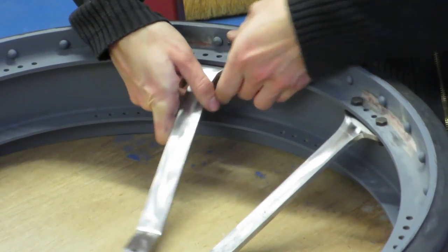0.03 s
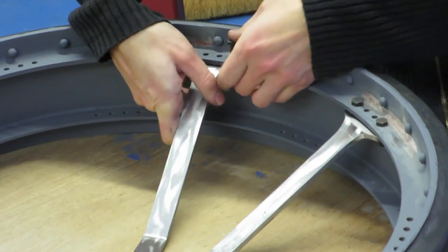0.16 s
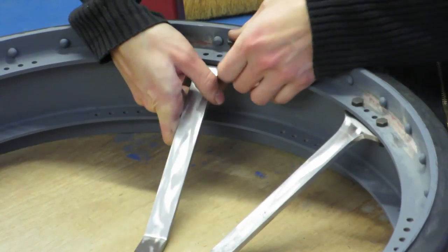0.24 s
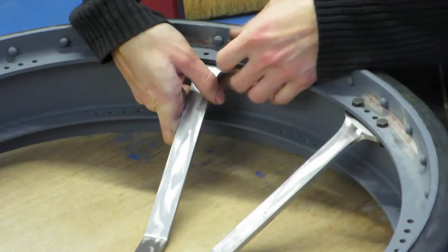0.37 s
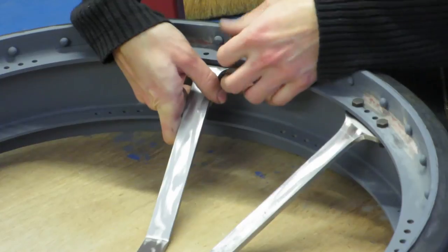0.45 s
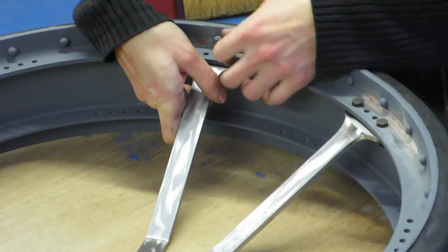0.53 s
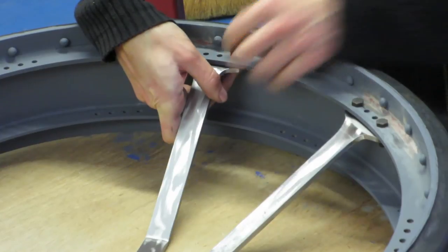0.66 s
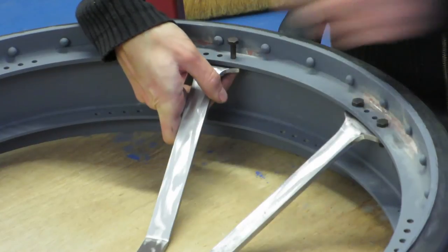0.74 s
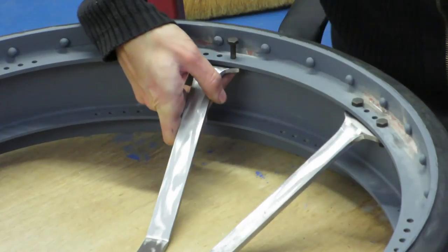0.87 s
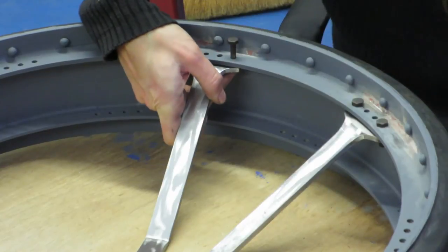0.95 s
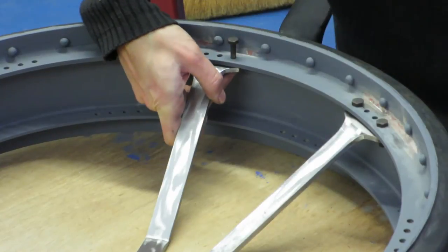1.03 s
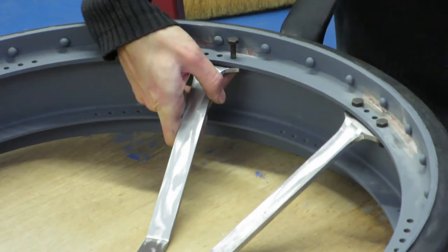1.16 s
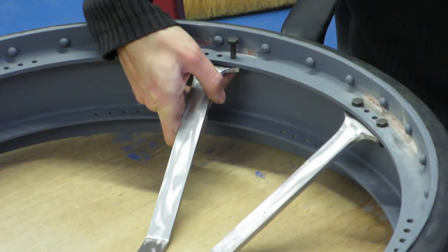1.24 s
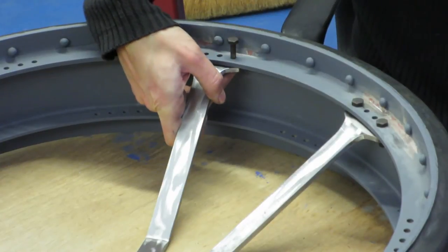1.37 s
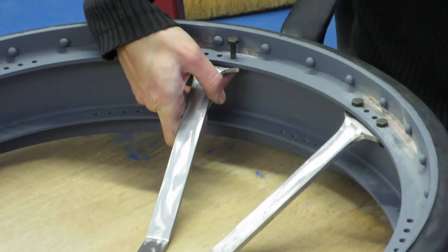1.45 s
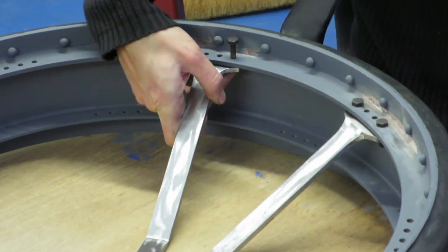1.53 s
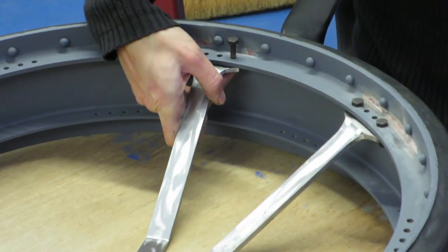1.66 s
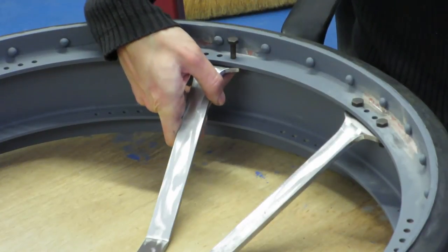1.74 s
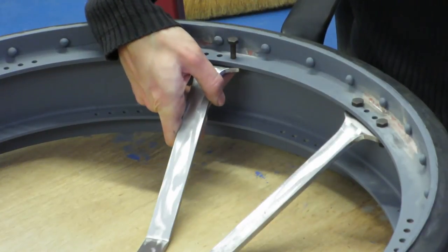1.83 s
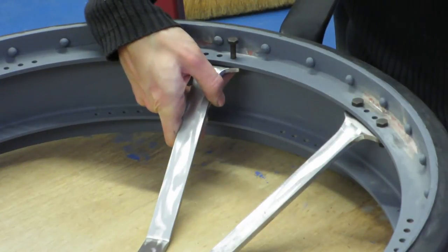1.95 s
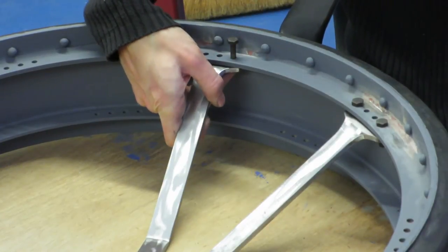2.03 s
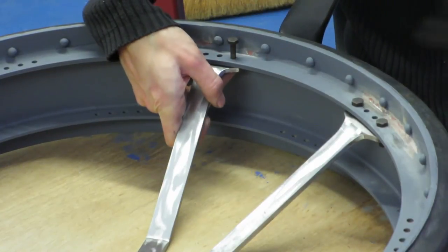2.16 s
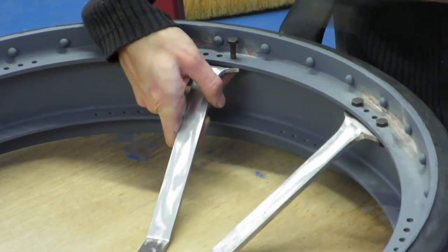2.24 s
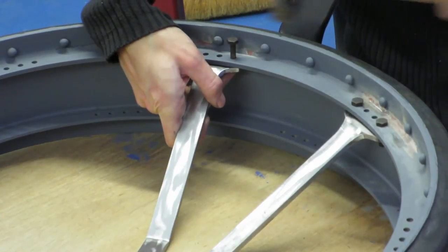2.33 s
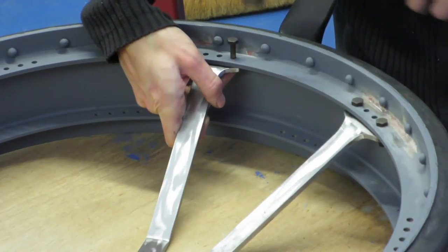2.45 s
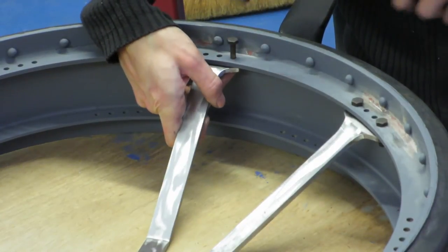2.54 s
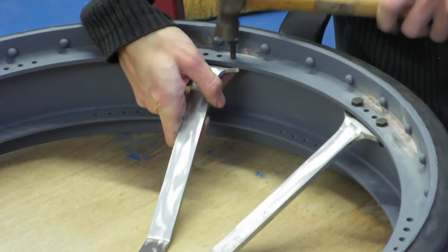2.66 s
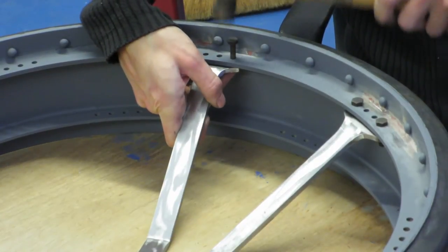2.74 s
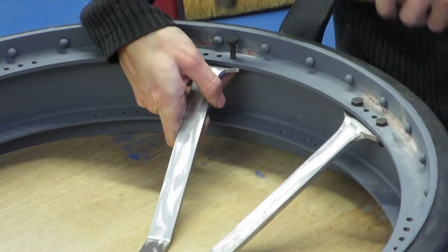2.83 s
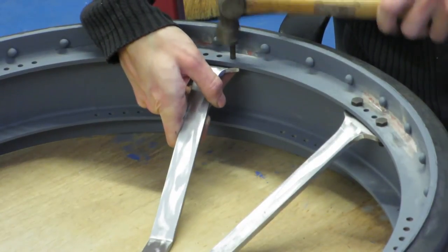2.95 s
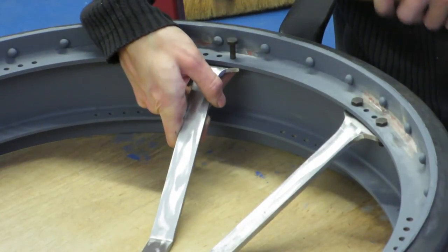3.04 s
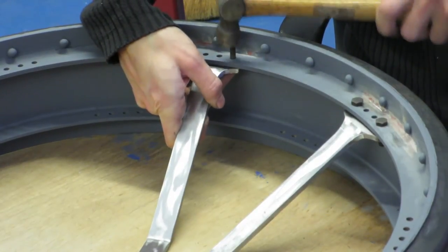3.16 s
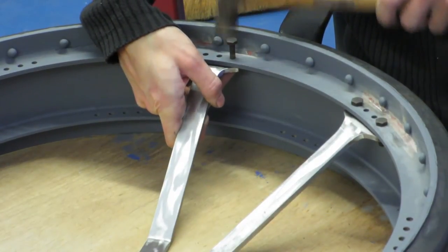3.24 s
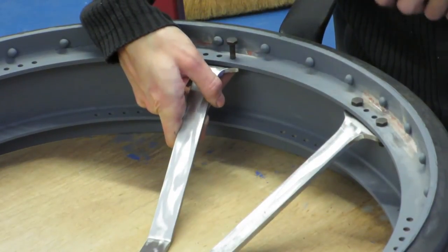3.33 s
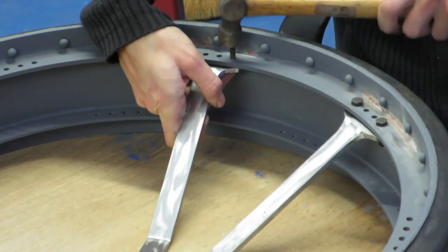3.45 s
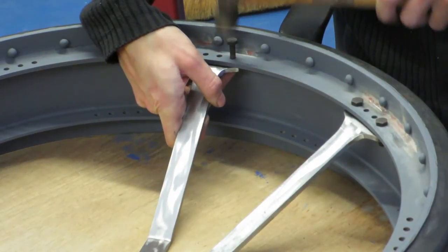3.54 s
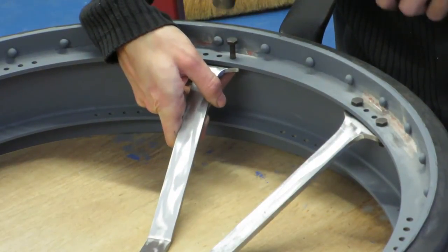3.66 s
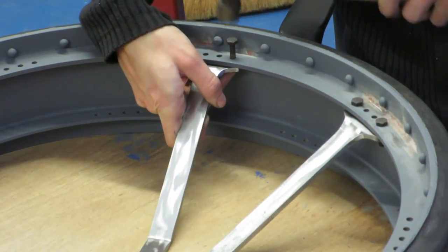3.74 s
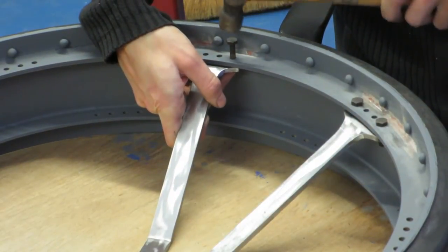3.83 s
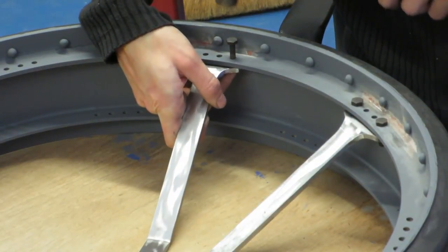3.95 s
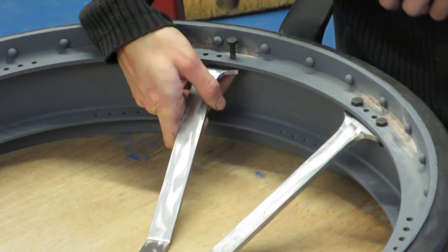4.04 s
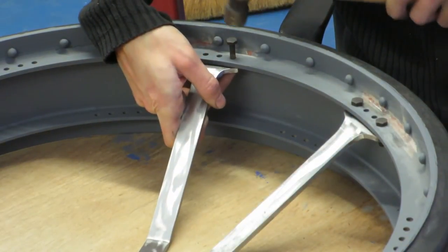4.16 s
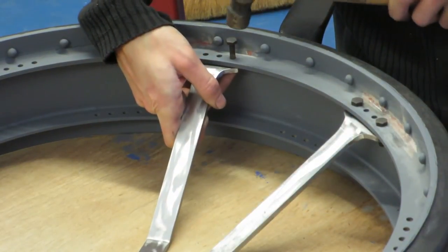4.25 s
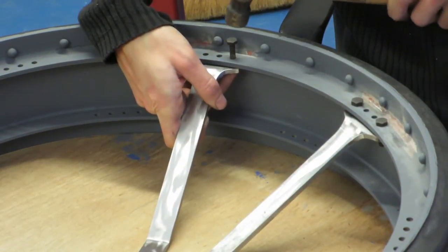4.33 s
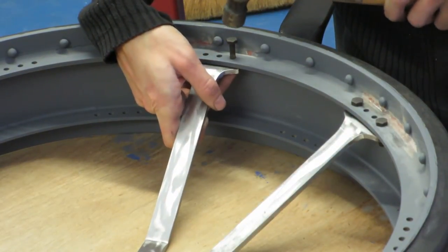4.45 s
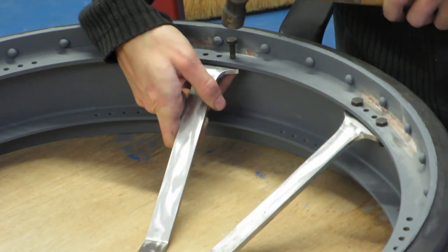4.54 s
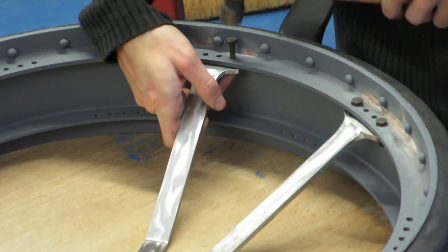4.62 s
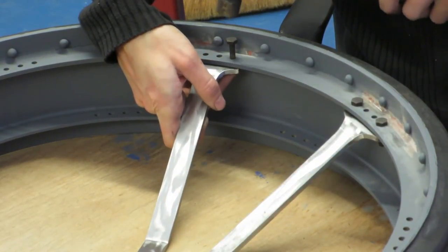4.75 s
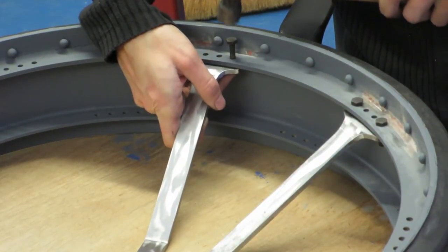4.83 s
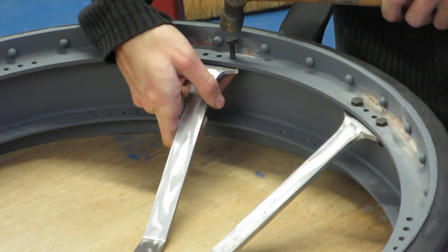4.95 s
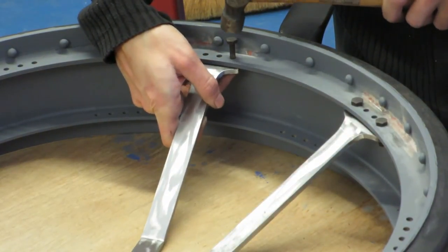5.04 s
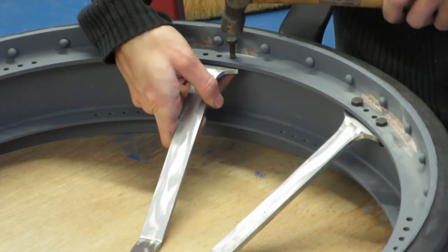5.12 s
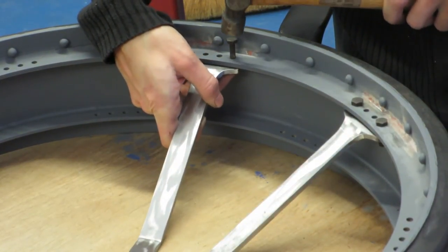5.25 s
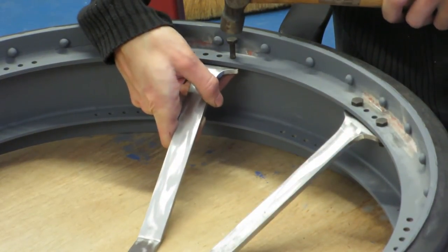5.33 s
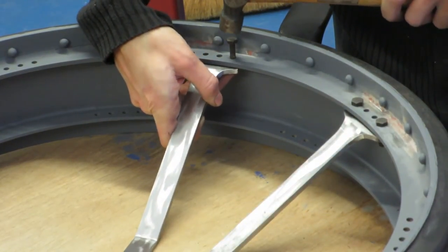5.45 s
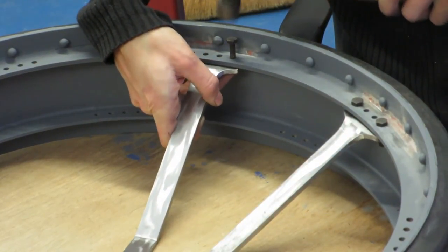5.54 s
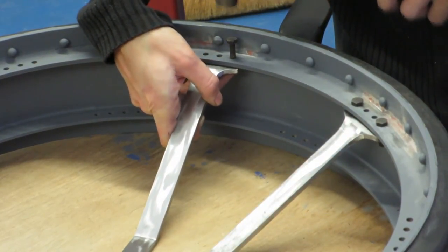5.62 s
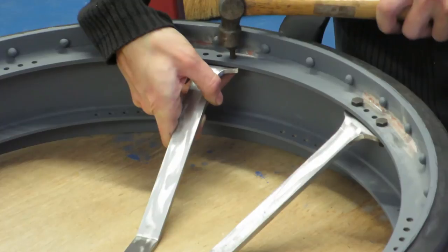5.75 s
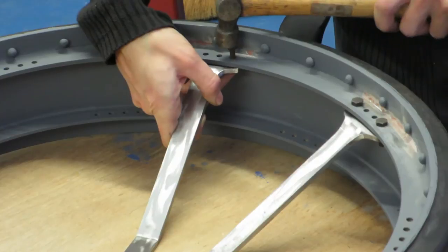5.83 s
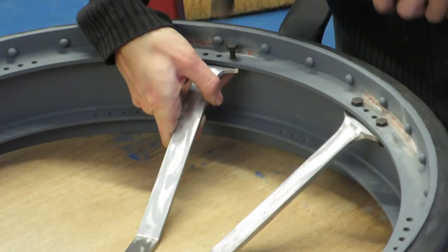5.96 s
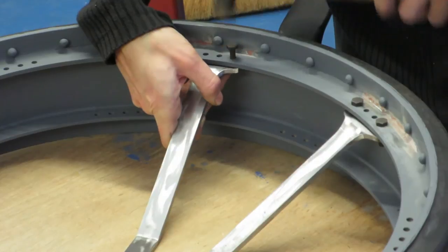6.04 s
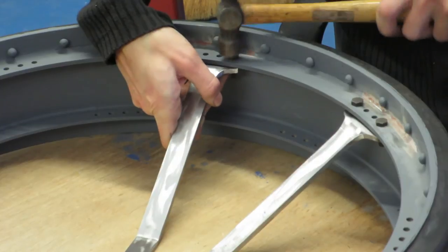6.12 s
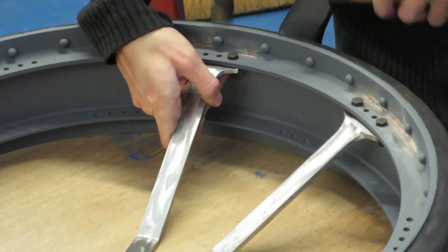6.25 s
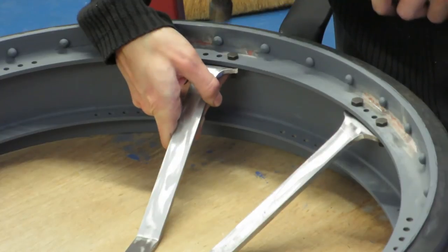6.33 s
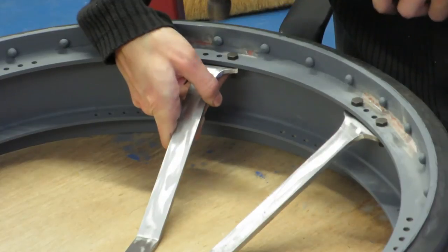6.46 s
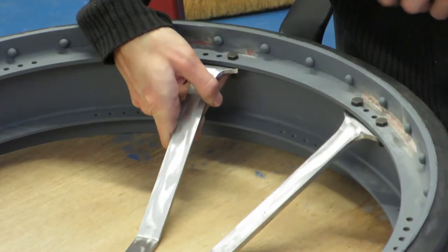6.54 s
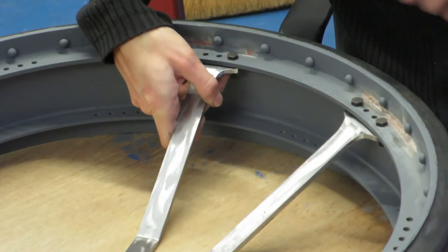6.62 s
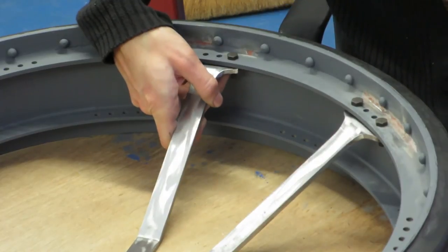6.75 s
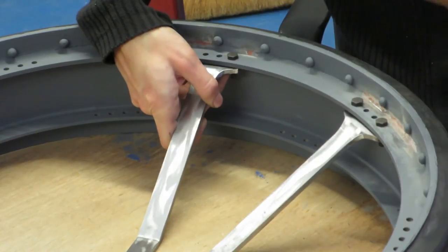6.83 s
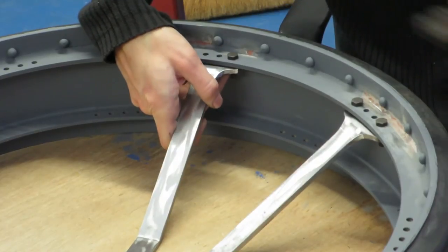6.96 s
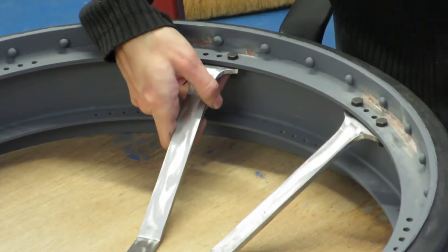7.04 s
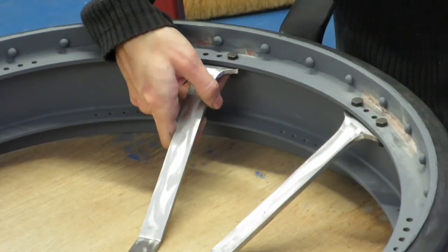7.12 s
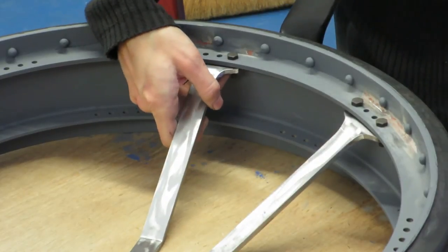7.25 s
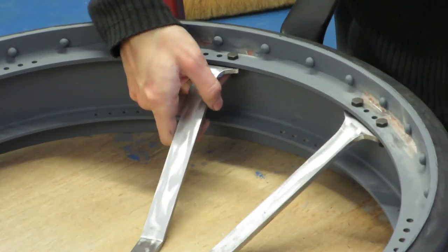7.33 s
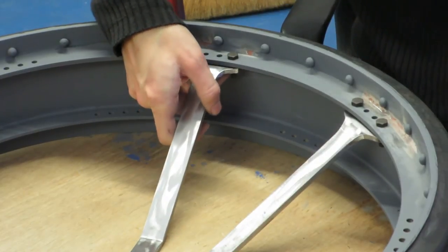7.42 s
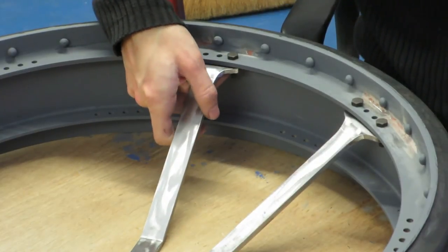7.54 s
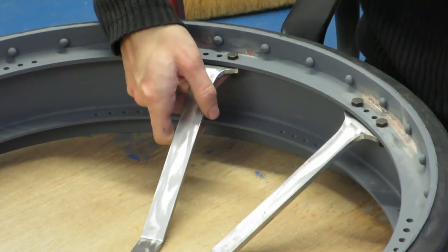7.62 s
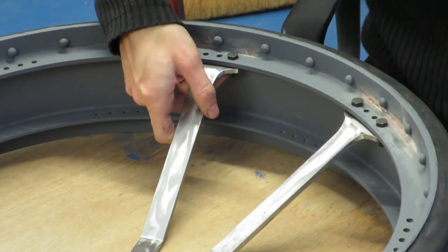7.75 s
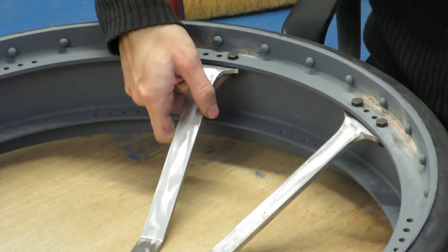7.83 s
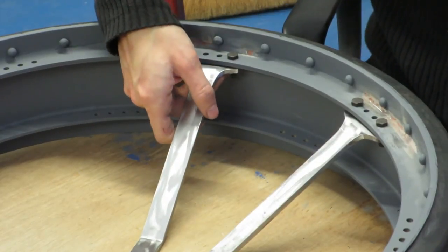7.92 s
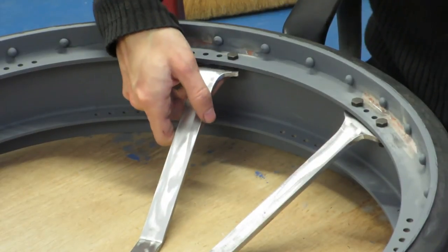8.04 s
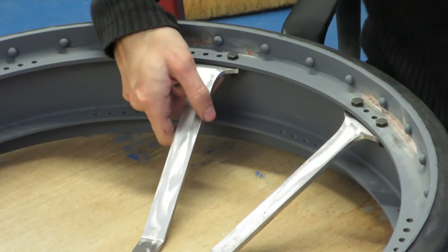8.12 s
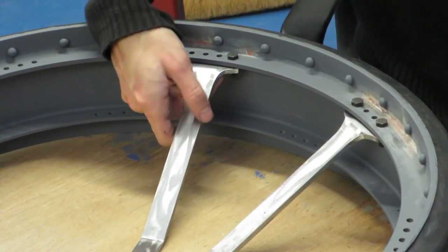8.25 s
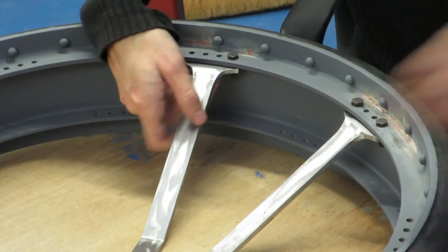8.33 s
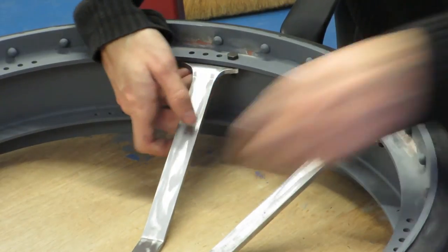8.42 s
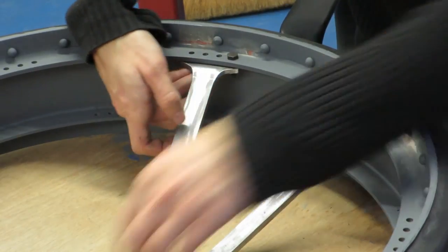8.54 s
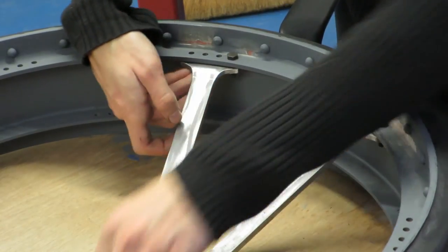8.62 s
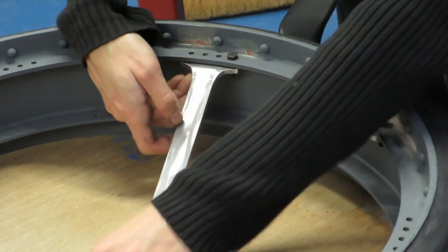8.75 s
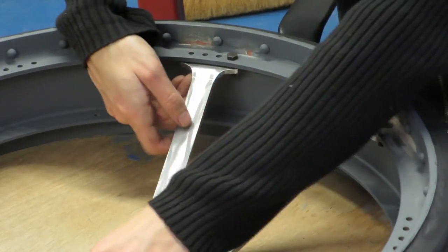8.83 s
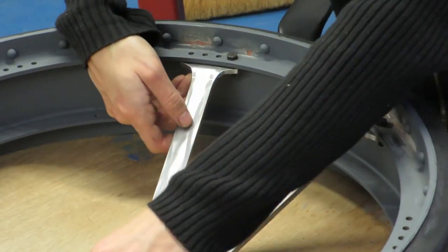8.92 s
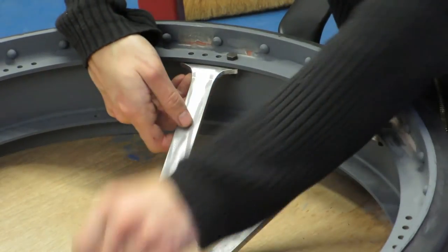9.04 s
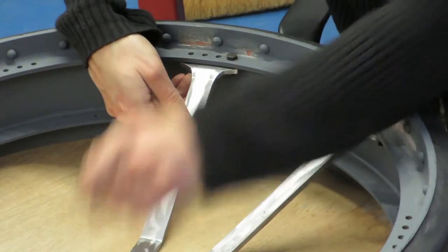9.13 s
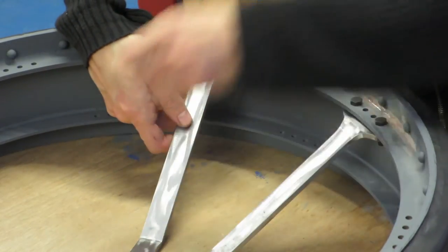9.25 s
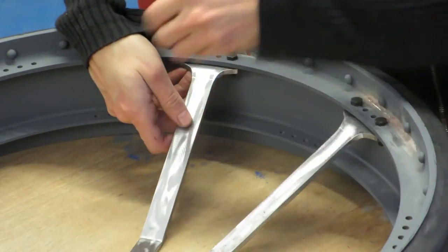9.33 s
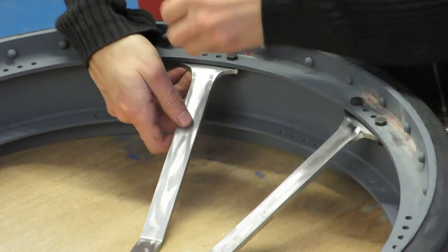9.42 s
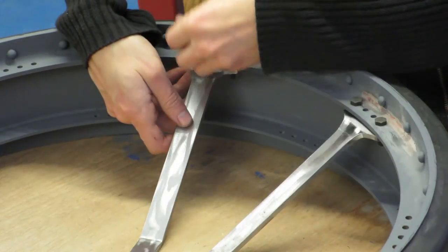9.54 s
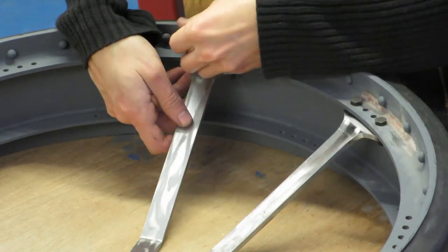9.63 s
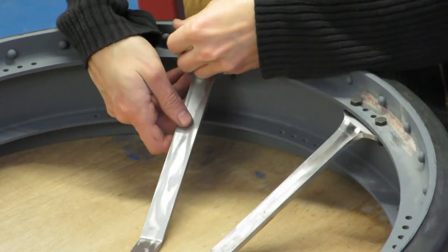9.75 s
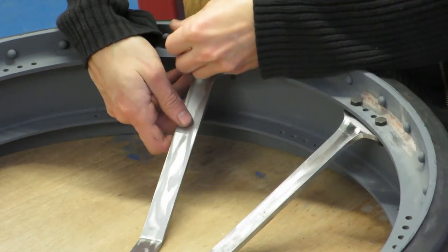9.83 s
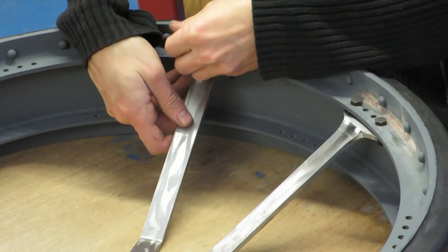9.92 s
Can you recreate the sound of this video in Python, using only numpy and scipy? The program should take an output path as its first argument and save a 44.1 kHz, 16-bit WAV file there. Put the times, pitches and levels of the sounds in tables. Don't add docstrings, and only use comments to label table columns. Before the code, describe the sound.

Close stereo microphone, hard-walled workshop, steady dull hum. A spoke clunks on metal, small rivets tinkle brightly, then three quick hammer strikes crack loudly, overloading slightly and echoing. The wheel rocks softly; a skidding blow and a duller seated blow come less than half a second apart. Later there is a heavy bench thump, a bouncing steel tool with bright ring, light bumps, a tick and quiet handling.

```python
import sys
import numpy as np
from scipy import signal
from scipy.fft import irfft
from scipy.io import wavfile
from scipy.ndimage import uniform_filter1d

SR = 44100
rng = np.random.default_rng(int(sys.argv[2]) if len(sys.argv) > 2 else 0)


def wav_out(sig):
    wavfile.write(sys.argv[1], SR, np.round(np.clip(np.atleast_2d(sig).T, -1, 1) * 32767).astype(np.int16))


def ratio(d):
    e = np.asarray(d, float) / 20
    return 10 ** e


N = 440118

# [start t/s, knock level/dB, then thud, click and ring level/dB over the knock]
HAMMER_BLOWS = [
    (2.921, 1.5, -9.5, -8, -16),
    (3.188, -1, -10.5, -8, -13.5),
    (3.205, -27.5, 17.5, -15.5, -22),
    (3.455, -1.5, -11, -9, -15.5),
    (3.477, -18.5, 11.5, -21, -26),
]
GLANCING_BLOW = [
    (5.7195, -10, -21, 5, -1.5),
    (5.731, -21, -10.5, 2.5, -12.5),
    (5.752, -30, 5.5, -20.5, -25),
    (6.118, -25, -21.5, 3.5, -17),
]
RIVET_SEATS = [
    (5.735, -54, -13.5, -12.5, 5),
    (6.135, -48.5, -8, -16, 7.9),
]
LAST_BLOW = [
    (6.129, -5, -2.5, 0, -13.5),
    (6.138, -9.5, -5.5, -15.5, -17),
]
SPOKE_FITTED = [
    (.043, -48.5, 5.5, -9.5, 1.5),
    (.463, -14.5, 4, -23.5, -17.5),
    (.468, -28, -12, -12, 0.5),
    (4.140, -30.5, -9, -8.5, -5.5),
    (4.158, -33, 10, -37.5, -32.5),
    (4.468, -56.5, 13.5, -31.5, -9),
]
WHEEL_NUDGES = [
    (5.149, -35, 6, -19.5, 11.7),
    (5.157, -34, 4.4, -25, 8.6),
    (5.180, -39, 6, -26.5, 4),
    (5.201, -41.5, 8.6, -31, 3.1),
    (5.238, -46.5, 6, -27, 4),
    (5.270, -51, 6, -26.5, 6),
]
RIVET_TOUCHES = [
    (1.274, -45.5, 5, 1.2, -41),
    (1.388, -43.5, -20, 6, -1),
    (1.431, -46, -20.5, 5, -1),
]
RIVET_LANDINGS = [
    (1.340, -46, -12, -22, -3),
    (1.353, -40, -6, -28, -3),
    (1.3815, -20.5, -11, -25, -7),
    (1.418, -15.5, -20, -22, 2.5),
    (1.460, -21, -21, -26, 0),
    (1.4975, -9, -26.5, -12.5, 7.5),
]
TOOL_LANDS = [
    (8.036, -12, -5.5, -8, -10.5),
    (8.045, -19, 4.5, -7.5, -29),
    (8.109, -8, -35, -1, -19),
]
TOOL_BOUNCES = [
    (8.126, -14, -7.5, -7.5, 1.55),
    (8.193, -32, -22, -23.5, 2),
    (8.240, -23, -10, -12.5, 1),
]
NUT_SNAPS = [
    (6.603, -71, -13, -31, 6),
    (9.2492, -32.5, -16, -3.5, 7.4),
]
HANDLE_CLINKS = [
    (7.044, -61, 18, -32, -11.5),
    (7.141, -56, 12.5, -21, -0.5),
    (7.375, -62, -11, -33, -13.5),
]
BENCH_KNOCKS = [
    (.944, -47.5, -5, -5.5, -15),
    (7.437, -61.5, 8.5, -32, -9),
    (7.551, -62.5, 8, -20.5, -4),
    (8.729, -49, 14, -4, 9.5),
    (8.761, -28.5, -20, -33, -63),
    (8.928, -42, -4.5, -26, -30),
]
BENCH_SLAM = [
    (7.851, -17.5, 8.6, -13.5, -4.5),
    (7.878, -34, 18, -9, -12),
]
FINGER_TOUCHES = [
    (8.755, -53, -18.5, 4.5, -17.5),
    (8.897, -65, -12, 6, -26.5),
    (8.98, -60.5, -4, -13, -31),
    (9.012, -42.5, 6.5, -20, -30),
    (9.635, -46.5, -8, -7.5, -30.5),
    (9.850, -48.5, -9.5, 6, -39),
    (9.856, -43, -21.5, 0.5, -9),
]
# [start t/s, firmest t/s, end t/s, knock level/dB, click level/dB over the knock]
GLANCE_SLIDES = [
    (6.117, 6.119, 6.131, -29.5, 5.1),
]
RIVET_SLIDES = [
    (1.345, 1.478, 1.505, -44.5, -10.5),
]
TRAY_SLIDES = [
    (1.26, 1.46, 1.53, -43.5, -14),
]
TOOL_SLIDES = [
    (8.038, 8.045, 8.125, -28.5, -6.5),
    (8.11, 8.13, 8.314, -30, -17.5),
]
BENCH_SLIDES = [
    (8.76, 8.772, 8.84, -47, -31),
    (8.86, 8.96, 9.18, -54, -37),
]
HAND_SLIDES = [
    (1.8, 1.88, 2.53, -72.5, 6),
    (2.04, 2.08, 2.13, -69.5, 1),
    (2.1, 2.33, 3.6, -66, -13),
    (5.34, 5.41, 6.1, -66, -15),
    (7.365, 7.375, 7.46, -60, -31),
    (9.83, 9.88, 10.6, -64, -12.5),
]

# [f/Hz, level/dB, time to fall 60 dB t/s]
SPOKE = [(811, -11, 0.16), (1248, -15.5, 0.25), (1890, -15, 0.12), (3030, -16, 0.1), (4810, -6, .06),
         (4600, -17.5, 0.04), (6550, -13.5, 0.08), (6580, -15, 0.077), (7780, -12.5, 0.046),
         (8000, -11, 0.059), (9330, -13.5, 0.13), (9460, -10, 0.038), (11200, -8.5, 0.06),
         (13900, -20, 0.14)]
HAMMER_HEAD = [(245.1, -10, .1), (317, -1.5, .1), (718, -6.5, 0.073), (942, -10.5, 0.13),
               (1206, -8.5, 0.08), (1630, -10.5, 0.11), (1740, -10, 0.17), (1824, -12, 0.16),
               (3000, -16.5, .07), (400, -4, 0.058), (3300, -9, 0.018), (2010, -11.5, 0.071),
               (10850, -15.5, .08), (11340, -10, 0.05), (11940, -17.5, .05), (14500, -20, 0.04)]
HAMMER_FACE = [(2480, -9, 0.011), (2593, 1, .012), (3670, -6.5, 0.012), (4780, -15, 0.014)]
GLANCED_SPOKE = [(820, -16, 0.35), (935, -14, 0.075), (1893, -13, 0.17), (2410, 3.5, .01),
                 (3180, -13.5, 0.14), (3263, -6.5, 0.022), (4700, -7, 0.059), (6510, -13.5, 0.099),
                 (7530, -10, 0.024), (8600, -13.5, 0.072), (9400, -12.5, 0.079), (11040, -12.5, 0.0701),
                 (11363, -6, 0.024), (13700, -13.5, 0.08)]
PINNED_SPOKE = [(483.6, -2.5, .12), (824, -1.5, 0.24), (1036, -8, 0.066), (1262, 0, 0.13),
                (1500, -3.5, 0.056), (2255, -9.5, 0.14), (2320, 9, 0.014), (2727, -13, 0.17),
                (3050, -13, 0.13), (3290, -9.5, 0.15), (4690, -8, 0.053), (5460, 0, 0.0043),
                (7475, 0, 0.0096), (12300, -5.5, .006)]
LOOSE_SPOKE = [(107.6, 0, 0.24), (149.7, -4, 0.18), (247, -5, 0.14), (313.4, 2.5, 0.16), (420, -3, 0.084),
               (604, -1.5, 0.065), (675, -2.5, 0.15), (778, -9.5, 0.095), (1241, -1, 0.12),
               (2780, 4, 0.015), (3230, -8, 0.04), (4720, -5.5, 0.025), (2006, -8.5, 0.05),
               (7750, -6.5, 0.0068), (9370, -19, 0.034), (11100, -20.5, 0.016)]
RIM = [(110, -6, .3), (162, -0.32, 0.81)]
WHEEL = [(149, -3, 0.093), (249.5, -9, 0.082), (416.4, -3, 0.066), (481, 7.5, .015), (549, -1.5, 0.043),
         (1085, -11.5, 0.037), (1222, -13, 0.057), (1501, -13.5, 0.021), (2270, -21, 0.014)]
RIVET = [(6530, -14, 0.47), (6660, -18, 0.37), (7675, -9.5, 0.34), (10000, -12, 0.34), (11300, -10, 0.044),
         (11800, -4, 0.098), (12050, -17.5, 0.8), (12680, -26, .4), (13925, -19, .5)]
TRAY = [(450, -9, 0.033), (1007, -8, 0.035), (1370, -15.5, 0.026), (1720, 6, 0.0034), (2270, -5.5, 0.012),
        (2850, -8, 0.013), (4560, -15, 0.0073)]
TOOL_STEEL = [(426, 8.5, 0.073), (1090, -8, 0.031), (2210, -24, 0.034), (2720, 4.5, 0.066),
              (4330, -4, 0.05), (4560, -3.5, 0.069), (6540, -15, 0.186), (8670, -15, 0.096),
              (11290, -19, 0.092)]
TOOL_SHANK = [(1050, 7.5, 0.016), (1226, -2.5, 0.089), (1284, -7, 0.052), (1804, -14.5, 0.046),
              (2230, -11, 0.025), (2820, -8.5, 0.057), (3100, -14.5, 0.1), (8400, -27, 0.012)]
NUT = [(1320, -6.5, 0.03), (2240, -6.5, 0.015), (2760, -3.5, 0.011), (4530, -1, 0.0087)]
HANDLE = [(239, 5.5, 0.11), (318, 12, 0.075), (1240, -7.5, 0.18), (1660, -12, 0.057), (1800, -7, 0.094),
          (1990, -14, 0.11), (3170, -5, 0.06), (4700, -13, 0.059)]
BENCH_WOOD = [(133, 22, 0.048), (237, -1.5, 0.26), (318, 1.5, 0.13), (448, -30, 0.04), (614, -32, 0.12),
              (795, -32, 0.05), (1490, 4.5, 0.015)]
TABLE_TOP = [(107.7, -3, 0.79), (260, -11.5, 0.21), (330, -5.5, 0.22), (391, -8, 0.15), (455, 11.5, 0.035),
             (548, 6.5, 0.058), (620, 4.5, 0.046), (733, -18, 0.08)]
DRAGGED_THING = [(246, 3.5, 0.12), (876, 1.5, 0.028), (1370, -0.5, 0.058), (1750, -1.5, 0.076),
                 (2810, -15, 0.024)]

# moments [t/s, level/dB], then ringing pitches [f/Hz, level/dB, 60 dB fall t/s]
SPOKE_SINGS = [
    (2.921, -0.5),
    (3.188, -2),
    (3.455, 0.5),
    (4.141, -24.5),
]
SPOKE_LONG = [(1767, -26.5, .14), (2749, -33.5, .15), (4741, -38, 0.38), (6495, -44, .4), (7680, -50, .2),
              (10900, -50, .25)]
GLANCED_SINGS = [
    (5.7195, -2),
    (5.745, -8),
]
GLANCED_LONG = [(811, -37.5, 0.28), (1937, -40.5, .3), (3138, -48, .2), (4770, -48, .25), (6600, -48, .3),
                (8600, -50, .2)]
PINNED_SINGS = [
    (6.130, 0),
]
PINNED_LONG = [(1910, -37.5, .2), (2900, -37.5, 0.3), (3170, -37.5, .25), (3420, -49, .25),
               (4800, -46, 0.17)]
TOOL_SINGS = [
    (8.040, -13),
    (8.110, 2.5),
    (8.127, -9),
    (8.240, -6.5),
]
TOOL_LONG = [(1087, -32, 0.26), (1270, -33.5, 0.24), (2700, -37, 0.2), (3020, -37, .3), (4355, -44, 0.22),
             (6630, -43, 0.25), (8560, -42, 0.13), (12673, -73.5, .7), (13914, -69, 0.54)]
SHIVER = [(8.046, -53), (8.066, -40), (8.090, -48), (8.112, -43), (8.140, -50)]
SHIVER_RING = [(11290, 0, 0.35)]
JINGLE = [(1.3885, -4), (1.430, 1), (1.460, -4), (1.4975, -2), (1.530, 0.5)]
JINGLE_RING = [(4560, -66, .3), (6508, -55, 0.93), (6670, -55.5, .8), (7675, -50.5, 0.56), (10063, -53, .5),
               (13924, -72, .6)]
CLASH = [(1.452, -40), (1.463, -31), (1.476, -37), (1.490, -45)]
CLASH_RING = [(11360, -6, 0.092), (11690, 1, 0.18), (12060, -2, 0.088)]
TRAY_DRUMS = [(1.285, -43), (1.320, -39), (1.355, -33.5), (1.382, -30), (1.418, -32), (1.445, -31),
              (1.460, -29), (1.4975, -33)]
TRAY_FLOOR = [(100, -7.5, .25), (437.5, 0, 0.094), (513, -1, 0.09)]
REBOUNDS = [(3.4775, -13), (3.485, -17), (3.497, -16), (2.943, -20)]
REBOUND_RING = [(310, -0.5, 0.037), (413, -1, .04), (710, -5, 0.025)]
TAPS = [(7.437, -50), (7.551, -41), (8.729, -32.5), (8.760, -46)]
TAP_RING = [(188, 1, 0.097), (320, -0.5, 0.052), (537, -11, .04)]
BLIPS = [(6.600, -52), (6.606, -54)]
BLIP_RING = [(1400, 0, .04)]
DROP = [
    (1.4975, 0.5),
    (1.460, -20),
]
DROP_RING = [(1800, 0, 0.0048), (2410, -6, 0.007)]
CHIME = [(8.045, -33), (8.056, -26), (8.070, -27), (8.085, -31)]
CHIME_RING = [(2730, -7, .08), (4400, 0, .09), (4470, -2, .06)]

# [lowest f/Hz, highest f/Hz]
BANDS_HZ = [(165, 850), (850, 3400), (3400, 14000)]
# [f/Hz, time to fall 60 dB t/s]
WALL_FADE = [(100, .6), (260, .5), (700, .62), (1840, .66), (3200, .7), (4850, .6), (8000, .5),
             (13000, .42)]
# [f/Hz, echo level/dB]
WALL_COLOUR = [(100, -3), (300, 1), (900, 0.5), (1900, 2.5), (3600, -1.5), (6500, -1), (13500, -10),
               (15500, -34)]
# [f/Hz, left-right likeness (1 = the same)]
WALL_SAME = [(120, .9995), (300, .98), (700, .75), (1500, .5), (3000, .3), (8000, .2)]
# [f/Hz, level/dB per Hz]
HUM = [(36, -25.5), (62, -9), (75, -0.5), (181, 0), (296, -3), (340, -4.5), (400, -6), (1090, -13),
       (1250, -9), (1410, -13.5), (2650, -19.5), (3260, -24), (14800, -38.5), (16300, -44)]
# [f/Hz, left-right likeness (1 = the same)]
HUM_SAME = [(60, 0.97), (180, 1), (550, -0.49), (1650, -0.27), (4970, -0.64), (15000, 1)]
# [f/Hz, level/dB, wavering f/Hz, steady share (0 to 1)]
TONES = [(49.3, -60, 3, 0.91), (118, -72, 8, 0.26), (146, -61, 24, 0.07), (176, -61.5, 90, .1),
         (1220, -76.5, 40, .1), (15735, -80, 3, .9)]
# [t/s, gain drop level/dB]; a negative drop lifts the gain
GAIN_DROPS = [
    (2.921, 11.5),
    (3.186, 17.5),
    (3.456, -7),
    (5.717, 6.5),
    (6.13, 7),
    (8.036, 4.5),
    (8.109, 2.5),
]

BEAT_DEPTH = 0.36


def hammer_blows():
    return contacts(HAMMER_BLOWS, SPOKE + HAMMER_HEAD, 1.4, 1.4, 9700, grip=1.1, dull_db=2, low_hz=148)


def last_blow():
    return contacts(LAST_BLOW, PINNED_SPOKE, 1.2, 1.5, 15000, low_hz=119)


def glancing_blow():
    skid = contacts(GLANCING_BLOW, GLANCED_SPOKE, 2.1, 3.5, 13000, dull_db=2, low_hz=300)
    seat = contacts(RIVET_SEATS, RIM, 4, 2.5, 9000)
    return skid + seat + slides(GLANCE_SLIDES, SPOKE, 16000, -15, -12, 3.8, 4.2)


def after_rings():
    bodies = [(SPOKE_SINGS, SPOKE_LONG), (GLANCED_SINGS, GLANCED_LONG), (PINNED_SINGS, PINNED_LONG),
              (TOOL_SINGS, TOOL_LONG), (SHIVER, SHIVER_RING), (JINGLE, JINGLE_RING)]
    return sum(pings(*body, beat=0.34) for body in bodies)


def fitting_spoke():
    return contacts(SPOKE_FITTED, LOOSE_SPOKE, 6.5, 1.6, 4100, grip=0.81, dull_db=-3.5)


def wheel_nudges():
    return contacts(WHEEL_NUDGES, WHEEL, 2.2, 1.7, 6000, dull_db=-5.5)


def loose_rivets():
    touches = contacts(RIVET_TOUCHES, RIVET, 1.3, 0.38, 11000)
    return touches + slides(RIVET_SLIDES, RIVET, 10500, -0.5, 2.1, 12, 5.9)


def rivets_in_tray():
    landings = contacts(RIVET_LANDINGS, TRAY, 0.65, 1.3, 9000, dull_db=-7.5)
    return landings + slides(TRAY_SLIDES, TRAY, 13000, 5.1, -21, 19.7, 1.4)


def tool_laid_down():
    landing = contacts(TOOL_LANDS, TOOL_STEEL, 2.4, 2.7, 12000, dull_db=2)
    bounces = contacts(TOOL_BOUNCES, TOOL_SHANK, 4.8, 7.9, 6800)
    return landing + bounces + slides(TOOL_SLIDES, TOOL_STEEL, 4500, -0.03, -12, 3, 16.4)


def bench_knocks():
    return contacts(BENCH_KNOCKS, BENCH_WOOD, 9.1, 4.1, 6900) + contacts(BENCH_SLAM, TABLE_TOP, 2.9, 1.59, 6000)


def handle_and_drag():
    clinks = contacts(HANDLE_CLINKS, HANDLE, 3.24, 1.61, 7400)
    return clinks + slides(BENCH_SLIDES, DRAGGED_THING, 1270, 3.6, 1.6, 21, 21)


def nut_snaps():
    return contacts(NUT_SNAPS, NUT, 0.8, 1.1, 7800)


def small_knocks():
    bodies = [(CLASH, CLASH_RING), (TRAY_DRUMS, TRAY_FLOOR), (REBOUNDS, REBOUND_RING), (TAPS, TAP_RING),
              (BLIPS, BLIP_RING)]
    return sum(pings(*body) for body in bodies)


def fingers():
    touches = contacts(FINGER_TOUCHES, SPOKE, 3.6, 1.3, 7000, grip=0.81, dull_db=6.5)
    return touches + slides(HAND_SLIDES, SPOKE, 11000, 0.52, -30.5, 15, 33)


def contacts(events, modes, contact_ms, thud_slower, top_hz, grip=1.0, dull_db=0.0, low_hz=68.0):
    out = np.zeros(N)
    octaves = np.clip(np.log2(np.transpose(modes)[0] / 4000), -1.5, 1.5)
    chances = rng.standard_normal((len(events), 4000))
    for (s, db, thud_db, click_db, ring_db), chance in zip(events, chances):
        reach_hz = top_hz * ratio(1.2 * click_db)
        length_s = contact_ms / 1000 * ratio(0.14 * thud_db)
        burst = puff(chance, length_s, thud_slower)
        for edges, rel_db, sign in zip(BANDS_HZ, (thud_db, 0, click_db), (1, -1, 1)):
            push = dulled(band(band(burst, edges), (low_hz, 20000)), reach_hz)
            add(out, s, sign * ratio(db + rel_db) * push / abs(push).max())
        tilt_db = (0.56 * (click_db + 8.5) - dull_db) * octaves
        spot_db = 1.5 * chance[-len(modes):]
        held = np.array(modes) / [1, 1, grip]
        add(out, s, ratio(db + ring_db) * ring(held, tilt_db + spot_db))
    return out


def puff(chance, length_s, thud_slower):
    hz = np.fft.rfftfreq(len(chance), 1 / SR)
    span = length_s * read([(400, thud_slower), (1700, 0.91), (7000, 0.7)], hz)
    stretch = np.cumsum(span * hz[1]) * 1.5
    wait = (chance[:1000] ** 2 + chance[1000:2000] ** 2) / 4
    delay = span * np.interp(stretch, np.arange(1000), wait) + 0.0003
    burst = irfft(np.exp(-2j * np.pi * np.cumsum(delay * hz[1])))
    return burst * (np.arange(len(chance)) < 3000)


def ring(modes, extra_db, beat=BEAT_DEPTH):
    out = np.zeros(round(max(t60 for *_, t60 in modes) * SR) + 1)
    for (hz, db, t60), more_db in zip(modes, extra_db * np.ones(len(modes))):
        t = np.arange(0, t60, 1 / SR)
        fade = ratio(db + more_db - 60 * t / t60)
        build = 1 - np.exp(-t * hz / 1.5)
        throb = 1 + beat * np.sin(2 * np.pi * 0.0091 * hz * t + db)
        add(out, 0, fade * build * np.sin(2 * np.pi * hz * t) * throb)
    return out


def pings(events, modes, beat=BEAT_DEPTH):
    out, body = np.zeros(N), ring(modes, 0, beat)
    for s, db, *_ in events:
        add(out, s, ratio(db) * body)
    return out


def slides(strokes, modes, top_hz, thud_db, ring_db, rise_db, fall_db):
    strength = ratio(3 * np.minimum(rng.exponential(1, N), 5))
    happens = rng.random(N) < 5000 / SR
    slips = strength * happens * rng.choice([-1, 1], N)
    thud, knock, click = (evened(dulled(band(slips, edges), top_hz)) for edges in BANDS_HZ)
    body = ring(modes, 0)
    out, drive, t = np.zeros(N), np.zeros(N), np.arange(N) / SR
    for start, firm, end, db, top_db in strokes:
        swell_db = np.interp(t, sorted([start, firm, end]), [db - rise_db, db, db - fall_db], -200, -200)
        level = ratio(swell_db)
        out += level * (-knock + ratio(thud_db) * thud + ratio(top_db) * click)
        drive += level * ratio(ring_db) * slips / slips.std()
    return out + signal.fftconvolve(drive, body / np.linalg.norm(body))[:N]


def ports(mid, lean):
    t = np.arange(256) / SR
    scatter = rng.standard_normal(len(t)) * np.exp(-t / 0.0015)
    scattered = signal.oaconvolve(mid, scatter / np.linalg.norm(scatter))[:N]
    side = band(lean, (900, 20000)) + ratio(-5) * band(scattered, (2200, 15000))
    return np.array([mid + side, mid - side])


def walls(x, gap=200, early=1.0, early_s=0.01):
    taps = np.zeros((2, SR))
    slots = np.arange(gap, SR - 20, 20)
    at = slots + rng.integers(0, 20, (2, len(slots)))
    np.put_along_axis(taps, at, rng.choice([-1.0, 1.0], at.shape), 1)
    hz, t, z = signal.stft(taps, SR, nperseg=256)
    fade = ratio(-60 * t / read(WALL_FADE, hz)[:, None]) * (1 + early * np.exp(-t / early_s))
    fade *= ratio(read(WALL_COLOUR, hz))[:, None] / np.linalg.norm(fade, axis=1)[:, None]
    tail = signal.istft(pair(z[0], z[1], read(WALL_SAME, hz)) * fade, SR, nperseg=256)[1]
    per_frame = 128 / 20
    return signal.fftconvolve(x[None], tail / np.sqrt(per_frame), axes=1)[:, :N]


def workshop():
    frames, hz = N // 512 + 5, np.fft.rfftfreq(2048, 1 / SR)
    a, b, c, d, patches = rng.standard_normal((frames, 1025, 5)).T
    patches = evened(uniform_filter1d(uniform_filter1d(patches, 10, 0), 6, 1))
    z = pair(a + 1j * b, c + 1j * d, read(HUM_SAME, hz))
    patch_db = 1.72 + (hz < 400)
    z *= ratio(read(HUM, hz)[:, None] + patch_db[:, None] * patches)
    out = ratio(-51.5) * evened(signal.istft(z, nperseg=2048, noverlap=1536)[1][:, :N])
    t = np.arange(N) / SR
    for tone_hz, db, waver_hz, steady in TONES:
        r = np.exp(-np.pi * waver_hz / SR)
        waver = signal.lfilter([1], np.poly([r, r]), rng.standard_normal((N, 2)) @ [1, 1j])
        swing = steady + (1 - steady) * waver / waver.std()
        out += ratio(db) * evened((swing * np.exp(2j * np.pi * tone_hz * t)).real)
    return out


def gain_control():
    t = np.arange(N) / SR
    return ratio(-sum(db * (t > s) * np.exp(-abs(t - s) / 1.4) for s, db in GAIN_DROPS))


def evened(x):
    return x / np.sqrt(np.mean(x ** 2) + 1e-20)


def read(points, hz):
    f, value = np.transpose(points)
    return np.interp(np.log(hz + 1), np.log(f + 1), value)


def add(mix, s, sound):
    part = mix[round(s * SR):][:len(sound)]
    part += sound[:len(part)]


def band(x, edges_hz):
    return signal.sosfilt(signal.butter(2, edges_hz, "band", fs=SR, output="sos"), x)


def dulled(x, top_hz):
    return signal.sosfilt(signal.butter(2, np.clip(top_hz, 1500, 20000), fs=SR, output="sos"), x)


def pair(left, other, same):
    same = np.clip(same, -1, 1)[:, None]
    return np.array([left, same * left + np.sqrt(1 - same ** 2) * other])


def scene():
    parts = [  # (sound, left bias dB, echo dB)
        (hammer_blows(), 0.3, 0.3),
        (pings(HAMMER_BLOWS, HAMMER_FACE), 0.3, -10),
        (last_blow(), 0.3, -0.5),
        (glancing_blow(), 2.2, -3),
        (after_rings(), 0.3, 1.5),
        (fitting_spoke(), 0.2, 0.3),
        (wheel_nudges(), 0.2, 0.3),
        (loose_rivets(), -0.15, -3.5),
        (rivets_in_tray(), -0.15, 0.4),
        (tool_laid_down(), -0.2, 0.3),
        (pings(DROP, DROP_RING) + pings(CHIME, CHIME_RING), -0.2, -5),
        (bench_knocks(), 0.3, -1.5),
        (handle_and_drag(), -0.3, -1.5),
        (nut_snaps(), -1.2, -18),
        (small_knocks(), 0.1, -3),
        (fingers(), -0.9, -11)]
    mid = sum(x for x, *_ in parts)
    lean = sum(x * np.tanh(bias_db * np.log(10) / 20) for x, bias_db, _ in parts)
    far = walls(sum(x * ratio(echo_db) for x, _, echo_db in parts))
    return far + workshop() * gain_control() + ports(mid, lean)


def low_pass(x):
    return signal.sosfilt(signal.butter(12, 16430, fs=SR, output="sos"), x)


def record(dry):
    heard = signal.sosfilt(signal.butter(2, 42, "high", fs=SR, output="sos"), dry)
    heard += ratio(-77.5) * dulled(rng.standard_normal(dry.shape), 7700)
    return low_pass(np.clip(heard, -1, 1))


dry = scene()
out = record(dry)
wav_out(out)
```